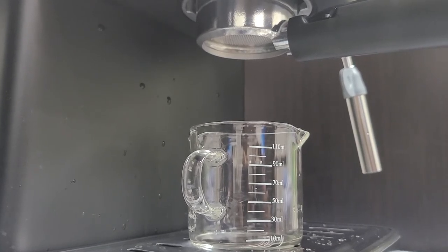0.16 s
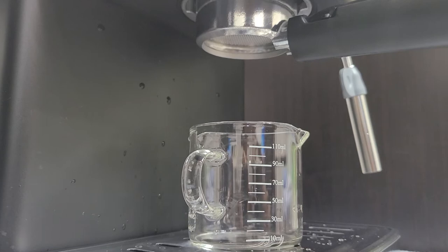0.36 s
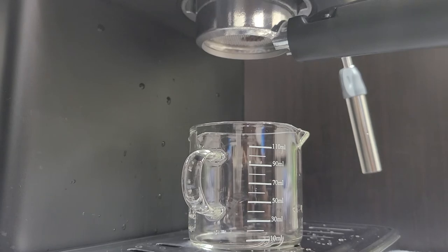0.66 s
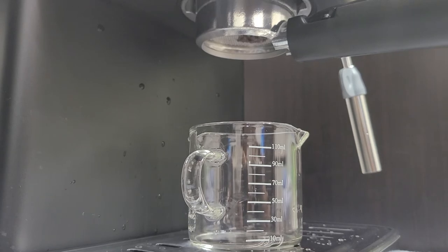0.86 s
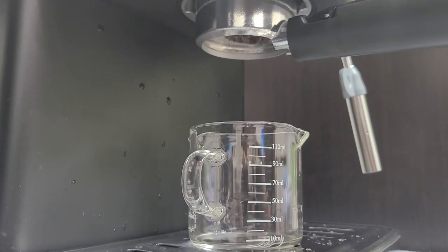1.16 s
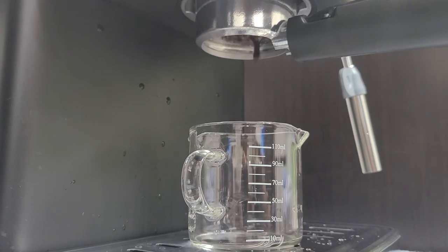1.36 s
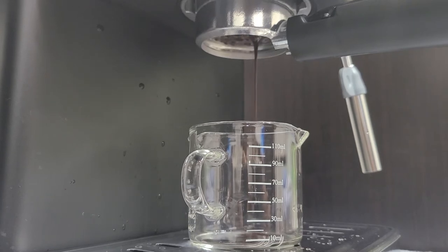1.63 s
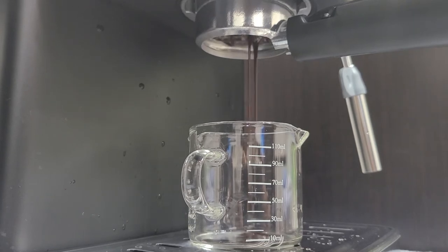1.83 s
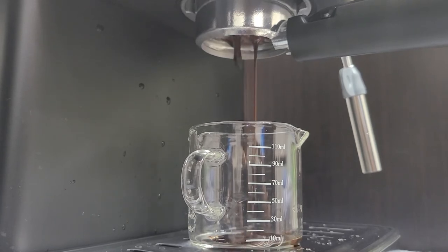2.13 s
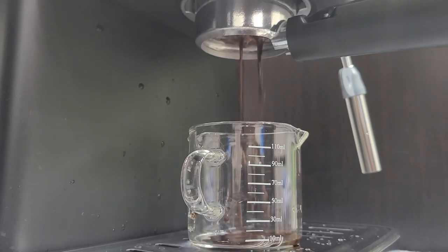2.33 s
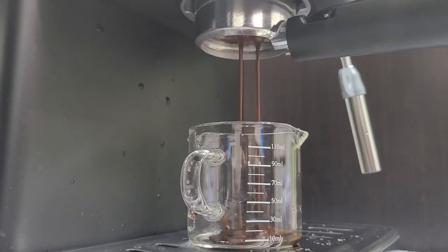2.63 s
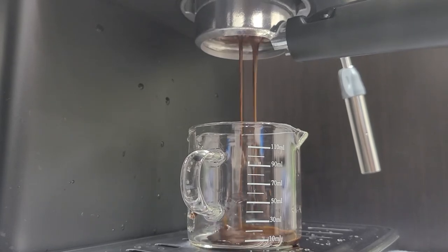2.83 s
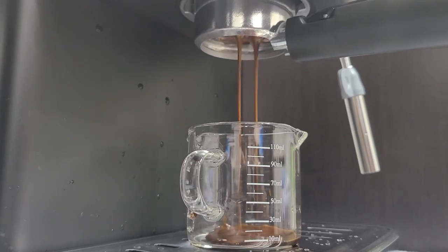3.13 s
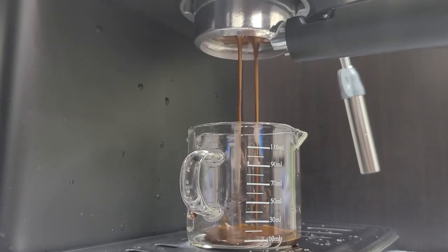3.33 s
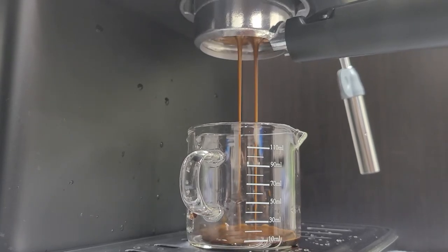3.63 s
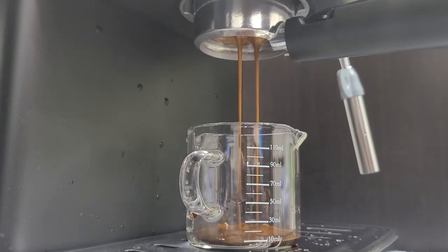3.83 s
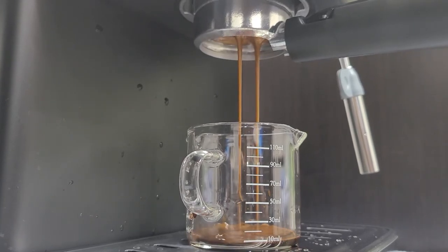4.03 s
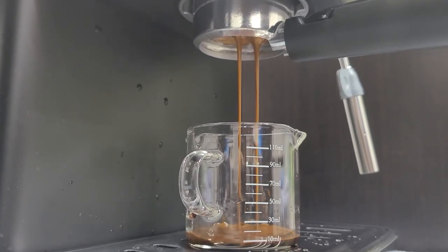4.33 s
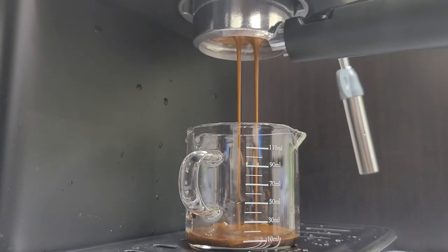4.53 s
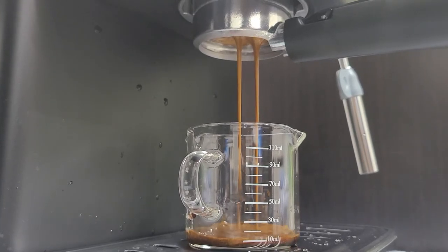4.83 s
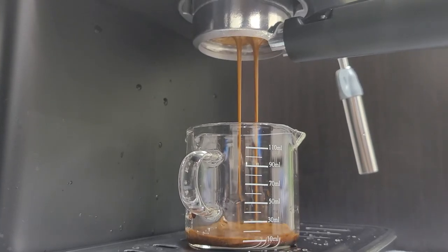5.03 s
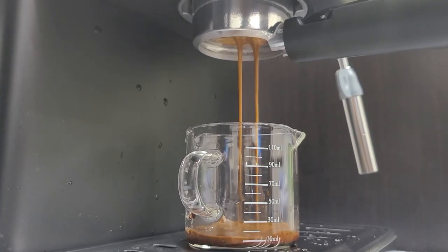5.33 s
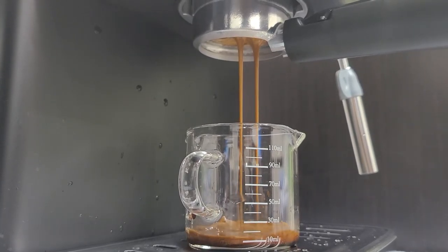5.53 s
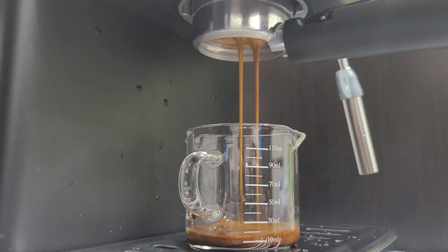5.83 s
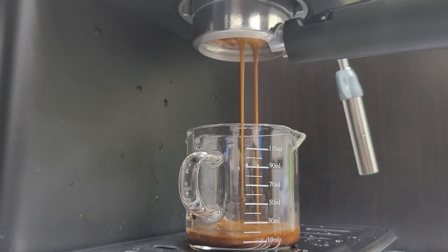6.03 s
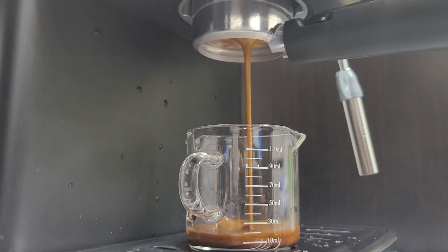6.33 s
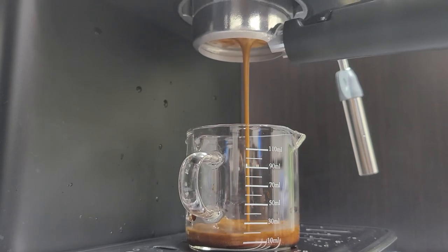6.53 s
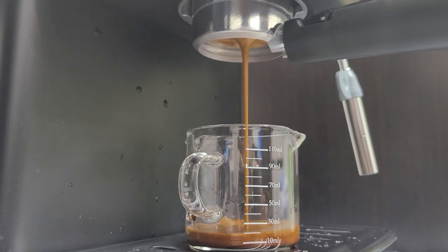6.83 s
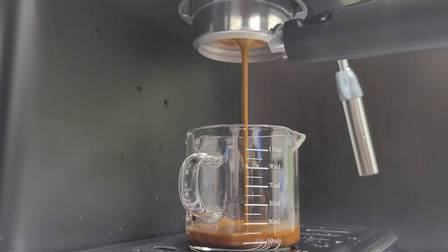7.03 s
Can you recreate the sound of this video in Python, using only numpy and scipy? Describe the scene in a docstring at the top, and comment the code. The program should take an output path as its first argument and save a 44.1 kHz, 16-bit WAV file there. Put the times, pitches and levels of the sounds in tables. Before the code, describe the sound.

Continuous harsh buzz from a coffee machine pump, casing ringing and loose parts chattering sixty times a second, over soft low room rumble. First only the pump; then a few bright splashes on glass, thickening into quick ticks and rounded plops as the jug's pool deepens. Late on, the dripping hushes quickly and the buzz carries on to the end. Heard close up, in stereo.

```python
"""A vibrating piston pump in a small espresso machine buzzes at mains rate as pressure builds: harmonics hum,
uneven strokes add half orders, contacts ring the casing, loose parts rattle and pipe flow hisses.
Coffee drips into a glass jug: splashes tick as noise bursts and glass tones, and bubbles plop as short
sines through the jug's air. The small drops die away when the two streams join.
A low room rumble, made of coloured noise, lies under it all."""
import sys
import numpy as np
from scipy import signal
from scipy.fft import rfft, irfft, next_fast_len
from scipy.io import wavfile
from scipy.ndimage import map_coordinates

SR = 44100
rng = np.random.default_rng(int(sys.argv[2]) if len(sys.argv) > 2 else 0)


def bounce(signal):
    """Save signal as a 16-bit WAV file at the path given by the first command-line argument."""
    frames = np.transpose(np.atleast_2d(signal))
    limited = np.clip(frames, -1, 1)
    pcm = np.round(limited * 32767).astype(np.int16)
    wavfile.write(sys.argv[1], SR, pcm)


N = 316638
SECONDS = np.arange(N) / SR

TOP_HZ = 15950  # upper band limit

# small drops: start of the patter, rise to full patter, deep pool, streams join, dying-away time constant
PATTER_S, FILL_S, DEEP_S, JOIN_S, HUSH_S = 3.0, 2.4, 4.0, 6.24, .06
DROPS_PER_S = 220  # full rate, of which each layer draws a share
SPRAY_DB = -60.5  # lowest drive of a small splash
# bubbles in a shallow pool, fading as it fills
THIN_HZ, THIN_SAG_HZ_PER_S, THIN_DB, THIN_FADE_DB = 2650, 350, -36, 9
# bubbles in a deep pool, growing up to DEEP_DB
DEEP_HZ, DEEP_SAG_HZ_PER_S, SAG_FROM_S, DEEP_DB, DEEP_GROW_DB = 1480, 125, 4.23, -36, 10.5

MAINS_HZ = 59.99
BUILD_S, BUILD_BEND = 2.6, 1.137  # time constant of the pressure; a bend over 1 gives a slow start
KNOCK_DB, RATTLE_DB, FLOW_DB = (-52, -50.5), (-57.5, -56.5), (-45.5, -48.5)  # (free, loaded)
SHIFT_BEND = 2.5  # over 1, contacts move late in the build-up
# the extra thump of every second stroke; spread in rad per order squared (free, loaded), start in rad
UNEVEN_LAG_MS, UNEVEN_SPREAD, UNEVEN_START = 9.18, (0.1177, 0.1488), 2.42


def amp(db):
    """Decibel law: the amplitude gain of a level."""
    return 10 ** (np.asarray(db) / 20)


def unit(x):
    """Power normalization: x at rms 1."""
    return x / np.sqrt(np.mean(x ** 2) + 1e-20)


def along(points, hz):
    """Linear interpolation of (frequency, value) points on a logarithmic frequency axis."""
    f, v = np.transpose(points)
    return np.interp(np.log(hz + 1), np.log(f + 1), v)


def wobble(rate):
    """Slow random modulation: a smooth curve through rate random knots a second."""
    knots = rng.standard_normal(int(N * rate / SR) + 4)
    return map_coordinates(knots, [np.arange(N) * rate / SR])


def filtered(x, response):
    """Linear filtering: the spectrum of x times a complex frequency response."""
    m = next_fast_len(N + SR // 2)
    return irfft(rfft(x, m) * response(np.fft.rfftfreq(m, 1 / SR)), m)[..., :N]


def resonance(f, centre_hz, width_hz):
    """Damped resonator: a response of 1 at its centre."""
    return 1j * f * width_hz / (centre_hz ** 2 - f * f + 1j * f * width_hz)


def pair(size, alike):
    """Correlated noise: left and right with a given likeness."""
    a, b = rng.standard_normal((2, size))
    turn = np.arccos(np.clip(alike, -1, 1)) / 2
    common, opposed = np.cos(turn) * a, np.sin(turn) * b
    return np.array([common + opposed, common - opposed])


def sided(spectrum):
    """Interchannel level difference: a colour tilted between left and right."""
    # tilt between the channels: frequency_hz, left_minus_right_db
    sides = [(200, 5), (400, 12.5), (1200, -11.5), (2400, 0.5), (4400, 5.5), (8000, 0.5), (15000, 9)]
    return lambda hz: amp(along(spectrum, hz) + np.outer([.5, -.5], along(sides, hz)))


def rumble():
    """Room noise: largely correlated random pressure, coloured towards the bass and slowly varied in level."""
    # spectrum of the room: frequency_hz, relative_db_per_hz
    colour = [(12, -26), (20, -21.5), (45, -2), (62, -2.5), (75, 3), (88, -6), (103, -7.5), (140, -14.5),
              (180, -9), (310, -120)]
    # level of the room: time_s, level_db
    room = [(0, -47.5), (2.6, -43.5), (5, -45.5), (7.18, -48)]
    level_db = np.interp(SECONDS, *np.transpose(room))
    return amp(level_db) * unit(filtered(pair(N, 0.82), lambda hz: amp(along(colour, hz))))


def fill(s):
    """Linear growth of the patter, 0 to 1."""
    return np.clip((s - PATTER_S) / FILL_S, 0, 1)


def drops(share):
    """Random arrivals: times of a share of the small drops, dying away once the streams join."""
    rate = DROPS_PER_S * fill(SECONDS) * np.exp(-np.maximum(SECONDS - JOIN_S, 0) / HUSH_S)
    return SECONDS[rng.random(N) < share * rate / SR]


def ticks(t60, ring_t60, left_db):
    """Impact radiation: each splash is a bright spit of noise and a short ring of the wet glass."""
    # loud splashes: start_s, drive_db, glass_centre_hz
    loud = [(1.958, -47, 5950), (2.018, -45, 8500), (2.072, -46, 7800), (2.096, -50, 8000),
            (2.135, -52, 8000), (2.724, -61, 3830), (2.750, -38.5, 8100), (2.829, -38, 8000),
            (2.907, -37, 5200), (2.996, -41, 5500), (3.123, -42, 7500), (3.185, -31, 8400),
            (3.258, -44.5, 4450), (3.495, -53, 4000), (3.509, -34.5, 4000), (3.533, -38, 4120),
            (3.654, -38.5, 7500), (3.836, -34, 3800), (3.933, -43, 7000), (4.003, -39, 7800),
            (4.240, -43, 6000), (4.589, -45, 5940), (4.687, -39, 8450), (4.786, -41.5, 4980),
            (4.873, -51, 5740), (4.895, -46, 5900), (4.916, -44, 5730), (4.951, -45, 5900),
            (5.149, -41.5, 5000), (5.393, -42, 5500), (5.503, -44, 7000), (5.550, -44, 6950),
            (5.621, -44, 7040), (5.658, -44, 5960), (6.079, -49, 6000), (6.197, -35, 3940),
            (6.215, -45, 5100), (6.328, -46, 8000)]
    # spectrum of the spit: frequency_hz, gain_db
    splash = [(2500, -26), (5000, -9), (8000, 12), (10500, 4.5), (13000, 8.5), (16000, 7.5)]
    # how well the glass rings: frequency_hz, ring_over_drive_db
    glass = [(4000, -4), (5200, -6), (6000, -8), (8000, -13)]
    spit, ring, t = np.zeros((2, N + SR)), np.zeros(N + SR), np.arange(SR // 40) / SR
    fall = amp(-60 * t / t60) * (1 - np.exp(-t / 0.0021))
    fall += 0.11 * amp(-60 * t / 0.11)  # weak, slower tail
    small = drops(.5)
    luck = rng.random((len(small), 2))
    spray = np.c_[small, SPRAY_DB + 14 * luck[:, 0] ** 2, 5000 + 7000 * luck[:, 1]]
    for s, db, hz in [*loud, *spray]:
        first = round(s * SR)
        spit[:, first:first + len(t)] += amp(db) * fall * pair(len(t), 0.14)
        detune = np.exp(0.12 * rng.standard_normal((12, 1)))
        tones = np.sin(2 * np.pi * hz * t * detune).sum(axis=0) / 2
        envelope = amp(db + along(glass, hz) - 60 * t / ring_t60) * (1 - np.exp(-t / 0.00047))
        ring[first:first + len(t)] += envelope * tones
    bright = filtered(spit[:, :N], lambda hz: amp(along(splash, hz)))
    return (bright + ring[:N]) * amp([[left_db], [-left_db]])


def thin_pitch(s):
    """Bubble resonance in a shallow pool, in Hz, falling with time."""
    return THIN_HZ - THIN_SAG_HZ_PER_S * (s - PATTER_S)


def deep_pitch(s):
    """Bubble resonance in a deep pool, in Hz, falling once SAG_FROM_S has passed."""
    return DEEP_HZ - DEEP_SAG_HZ_PER_S * np.maximum(s - SAG_FROM_S, 0)


def plops(swell_ms, lag_ms, left_db, echo_db):
    """Bubble resonance: each drop traps a bubble that rings a few cycles and stirs the air in the jug."""
    # loud plops: start_s, drive_db
    loud = [(3.2192, -27.5), (3.475, -30.5), (3.768, -33), (3.803, -34), (3.842, -35), (3.893, -30.5),
            (3.953, -34), (3.971, -38), (3.989, -35), (4.0193, -38), (4.037, -31), (4.0776, -32.5),
            (4.1654, -29.5), (4.2667, -30), (4.4858, -27.5), (4.5438, -26.5), (4.619, -24), (4.6477, -27),
            (4.704, -26), (4.7725, -28), (4.826, -27.5), (4.8464, -28), (4.9157, -23), (4.951, -28),
            (4.97, -21), (5.0722, -29), (5.0887, -24.5), (5.136, -34), (5.189, -23.5), (5.27, -25.5),
            (5.298, -22.5), (5.3216, -21.5), (5.3929, -26), (5.436, -24), (5.5005, -20.5), (5.5546, -25.5),
            (5.585, -24.5), (5.6223, -27), (5.6591, -17), (5.6878, -27), (5.711, -27), (5.7336, -18),
            (5.8005, -21.5), (5.846, -21.5), (5.9325, -15), (5.9602, -24), (6.006, -23), (6.0187, -20.5),
            (6.055, -23), (6.0795, -25.5), (6.118, -25.5), (6.1712, -27), (6.194, -29), (6.2169, -20.5),
            (6.2513, -27), (6.398, -24.5)]
    # resonances of the air in the jug: centre_hz, width_hz, gain_db
    jug = [(1370, 217, 8), (1700, 140, -3.5), (800, 170, -1.5), (2350, 310, -0.5)]
    rows = []
    for s, db in loud:
        pitch = thin_pitch(s) if s < DEEP_S else deep_pitch(s)
        rows.append((s, db, pitch * np.exp(0.01 * rng.standard_normal())))
    layers = [(deep_pitch, DEEP_DB - DEEP_GROW_DB, DEEP_GROW_DB, .8),
              (thin_pitch, THIN_DB, -THIN_FADE_DB, .6)]
    for pitch, start_db, change_db, share in layers:
        s = drops(share)
        luck = rng.standard_normal((len(s), 2))
        level_db = start_db + change_db * fill(s) + 3 * luck[:, 0]
        rows += list(np.c_[s, level_db, pitch(s) * np.exp(.11 * luck[:, 1])])
    bubbles, t = np.zeros(N + SR), np.arange(SR // 20) / SR
    u = 1000 * t / swell_ms
    swell = (u * np.exp(1 - u)) ** 2
    for s, db, hz in rows:
        first = round(s * SR)
        bubbles[first:first + len(t)] += amp(db) * swell * np.sin(2 * np.pi * hz * t)
    bubbles = bubbles[:N]

    def air(f):
        return sum(amp(db) * resonance(f, c, w) for c, w, db in jug)

    def late(f):  # the right side hears the jug later
        delay_s = np.array([[0], [lag_ms / 1000]])
        return amp([[left_db], [-left_db]]) * np.exp(-2j * np.pi * f * delay_s)

    wet = 0.15 * bubbles + filtered(bubbles, air)
    echo = pair(len(t), 0) * amp(echo_db - 60 * t / 0.083)
    walls = signal.fftconvolve(wet[None], echo, axes=1)[:, :N]
    return filtered(wet, late) + walls


def pressure():
    """Saturating growth: load on the pump, from 0 free towards 1 full."""
    return 1 - np.exp(-(SECONDS / BUILD_S) ** BUILD_BEND)


def loaded(ends):
    """Linear dependence on load: a value that moves from free to loaded with the pressure."""
    return ends[0] + (ends[1] - ends[0]) * pressure()


def flow():
    """Turbulence noise: water forced through the pipes, calmer as the pressure rises."""
    # spectrum of the flow: frequency_hz, relative_db_per_hz
    colour = [(90, -45), (140, -12), (200, -8.5), (300, -19), (680, -16.5), (1000, -21), (1500, -16),
              (1950, -23.5), (2300, -20), (3000, -21), (4300, -23), (5500, -54)]
    level_db = loaded(FLOW_DB) + 1.14 * wobble(9)
    return amp(level_db) * unit(filtered(pair(N, 0.078), sided(colour)))


def spikes(at, size):
    """Band-limited impulses: windowed sinc pulses placed between samples."""
    near = np.round(at)[:, None] + np.arange(-4, 5)
    offset = near - at[:, None]
    shape = np.sinc(offset) * np.cos(np.pi * offset / 10) ** 2
    index = np.clip(near, 0, N).astype(int)
    return np.bincount(index.ravel(), (size[:, None] * shape).ravel(), N + 1)[:N]


def knocks(free_db, loaded_db, slip_ms, t60=0.038, steady=0.63):
    """Modal excitation: contacts ring the casing and shake loose parts, with scatter that shrinks under load."""
    # piston and valve contacts in one stroke:
    # free_ms, loaded_ms, free_relative_db, loaded_relative_db, every_second_stroke_db, colour_centre_hz
    contacts = [(0.17, 0.24, -2, 11.5, 1, 4000), (0, 0, 3, -4, -2.5, 5120), (0, 0, -0.5, -8, -2, 2440),
                (2, 2, 5, 2.5, -1, 2755), (5.5, 5.5, -16, 5, 1.5, 2760), (9, 4.9, -1, -1, 5, 5180),
                (9, 5, -3, -5.5, 2.5, 7300), (11.5, 10, 6, -14, -6, 2400), (14.5, 13, 4, -18, -4, 2450)]
    # modes of the casing: centre_hz, width_hz, left_relative_db, right_relative_db, left_leads_rad
    casing = [(2235, 82, 6, 4, 6), (2699, 64, -19.5, 4, 0.5), (2870, 235, 2, -7.5, -0.5),
              (3290, 150, -8, -0.5, 1.5), (3830, 140, -0.5, -1, -1.23), (4087, 340, -11.5, -10, -0.6),
              (4945, 215, 3.5, -1.5, 3), (6070, 73, 5.5, 5.5, 9.5), (6990, 730, -62, -7, 2.5),
              (8200, 860, 1.5, -42, 40), (8580, 370, -4.5, -57, -2)]
    # spectrum of the loose parts: frequency_hz, relative_db_per_hz
    loose = [(1500, -40), (2700, -5), (3400, -13), (4000, -6), (4550, -11), (5050, 0), (5700, -11),
             (6300, -3), (8100, 0), (9100, -3), (10300, -14), (11400, -8), (12500, -13), (16000, -17)]
    starts = np.arange(0, N / SR, 1 / MAINS_HZ)
    second = np.arange(len(starts)) % 2
    work = pressure()[(starts * SR).astype(int)]
    scatter_db = free_db + (loaded_db - free_db) * work
    t = np.arange(SR // 20) / SR
    blows, gate = np.zeros(N), np.zeros(N)
    for free_ms, full_ms, free, full, second_db, centre_hz in contacts:
        luck = rng.standard_normal((len(starts), 2))
        ms = free_ms + (full_ms - free_ms) * work ** SHIFT_BEND
        ms += slip_ms * (1.1 - work) * luck[:, 0]
        level_db = free + (full - free) * work + second_db * second + scatter_db * luck[:, 1]
        train = spikes((starts + ms / 1000) * SR, amp(level_db))
        blows += filtered(train, lambda f: (.45 / .32 * resonance(f, centre_hz, .32 * centre_hz)) ** 2)
        gate += train

    def modes(f):
        total = 0
        for c, w, left, right, lead in casing:
            sides = amp([[left], [right]]) * np.exp(1j * np.array([[0], [-lead]]))
            total = total + sides * resonance(f, c, w)
        return f ** 6 / (f ** 6 + 980.0 ** 6) * total  # little bass radiates

    shaken = steady + unit(np.convolve(gate, amp(-60 * t / t60))[:N])  # noise swells at every contact
    rattle = filtered(pair(N, 0.062) * shaken, sided(loose))
    cavity = pair(len(t), .1) * amp(-26 - 60 * t / .035)  # the steel bay throws each knock back
    cavity[:, 0] = 1  # direct sound
    blows = signal.fftconvolve(blows[None], cavity, axes=1)[:, :N]
    ringing = unit(filtered(blows, modes))
    return amp(loaded(KNOCK_DB)) * ringing + amp(loaded(RATTLE_DB)) * unit(rattle)


def hum(shake_ms, sway):
    """Harmonic synthesis: the casing answers each stroke; uneven free strokes blur the upper orders."""
    # casing hum; half orders come from the uneven strokes, swing -1 reverses the panel under load:
    # mains_order, free_left_db, free_right_db, loaded_left_db, loaded_right_db, left_leads_rad, swing
    stroke = [(2, -58, -65, -57, -60, 0.5, 1), (3, -36, -37, -33, -35, 0.3, 1),
              (4, -42, -42, -42, -42, 0.4, 1), (5, -46, -53, -43, -50, 0.2, 1),
              (6, -40, -51, -42, -51, 1.3, 1), (7, -46, -51, -51, -56, -1.2, 1),
              (8, -49, -54, -40, -62, 2.1, -1), (9, -45, -58, -43, -64, 2.6, -1),
              (10, -46, -53, -48, -56, 2.1, 1), (11, -50, -55, -70, -60, 2.2, 1),
              (12, -50, -64, -52, -53, 2.3, 1), (13, -50, -69, -49, -53, -1.8, 1),
              (14, -62, -59, -48, -57, 2.8, -1), (15, -51, -56, -61, -77, 3.0, 1),
              (16, -57, -66, -63, -65, 2.3, 1), (17, -57, -66, -61, -62, 1.4, 1),
              (18, -64, -68, -64, -61, 1.8, 1), (19, -54, -60, -52, -67, -3.1, 1),
              (20, -52, -57, -44, -56, 3.1, 1), (21, -58, -61, -56, -67, 0.9, 1),
              (22, -63, -62, -54, -63, 1.1, 1), (23, -58, -61, -60, -51, 3.0, 1),
              (24, -65, -55, -67, -55, 2.9, 1), (25, -69, -70, -64, -56, 2.1, 1),
              (26, -60, -58, -60, -56, 2.0, 1), (27, -64, -64, -54, -56, 1.2, 1),
              (28, -59, -61, -57, -58, 2.0, 1), (29, -59, -66, -47, -61, 1.6, 1),
              (30, -60, -71, -53, -65, 1.5, 1), (31, -68, -64, -58, -62, -3.0, -1),
              (32, -62, -68, -62, -65, 2.9, 1), (2.5, -52, -57, -61, -67, 0.3, 1),
              (3.5, -50, -53, -51, -53, 0.5, 1), (4.5, -57, -68, -59, -61, 0.6, 1),
              (5.5, -52, -63, -64, -75, 1.3, -1), (6.5, -56, -63, -62, -71, 0.4, 1),
              (7.5, -53, -55, -67, -69, 1.5, 1), (8.5, -53, -65, -63, -67, 2.5, 1),
              (9.5, -53, -64, -58, -66, 2.5, 1), (10.5, -53, -58, -65, -71, 0.3, 1),
              (11.5, -49, -64, -67, -72, 0.2, 1), (12.5, -70, -62, -71, -61, -2.8, 1),
              (13.5, -69, -64, -58, -62, 1.8, 1), (14.5, -58, -63, -56, -73, -2.8, 1)]
    # when parts of the casing answer: from_order, lag_ms, spread_rad_per_order_squared, start_rad
    arrival = [(2, 3.47, -.6, -2.5), (7, 18.27, .263, 0.25), (15, 10.65, .054, -3)]
    load = pressure()
    free = (1 - 0.4 * load) ** 2
    s = SECONDS + shake_ms / 1000 * free * wobble(45)
    out = np.zeros((2, N))
    for order, free_l, free_r, full_l, full_r, lead, swing in stroke:
        size = np.outer(amp([free_l, free_r]), 1 - load)
        size += np.sign(swing) * np.outer(amp([full_l, full_r]), load)
        size *= 1 + sway * min(order / 8, 1.5) * free * wobble(14)  # each order sways by itself
        if order % 1:
            lag_ms, spread, start = UNEVEN_LAG_MS, loaded(UNEVEN_SPREAD), UNEVEN_START
        else:
            lag_ms, spread, start = [row for row in arrival if round(row[0]) <= order][-1][1:]
        angle = 2 * np.pi * MAINS_HZ * order * (s - lag_ms / 1000) + spread * order ** 2 + start
        out += size * [np.sin(angle), np.sin(angle - lead)]
    return np.sqrt(2) * out  # rms to peak


def scene():
    """Superposition: the sound pressures of room, jug and pump add."""
    jug = ticks(t60=0.0087, ring_t60=0.044, left_db=3.0)
    jug = jug + plops(swell_ms=0.98, lag_ms=0.44, left_db=6.5, echo_db=-28.5)
    pump = flow() + knocks(free_db=1.3, loaded_db=.6, slip_ms=.012)
    pump = pump + hum(shake_ms=0.036, sway=0.087)
    return rumble() + jug + pump


def record(dry):
    """Band limitation: nothing passes at or above TOP_HZ."""
    return filtered(dry, lambda hz: hz < TOP_HZ)


dry = scene()
out = record(dry)
bounce(out)
```